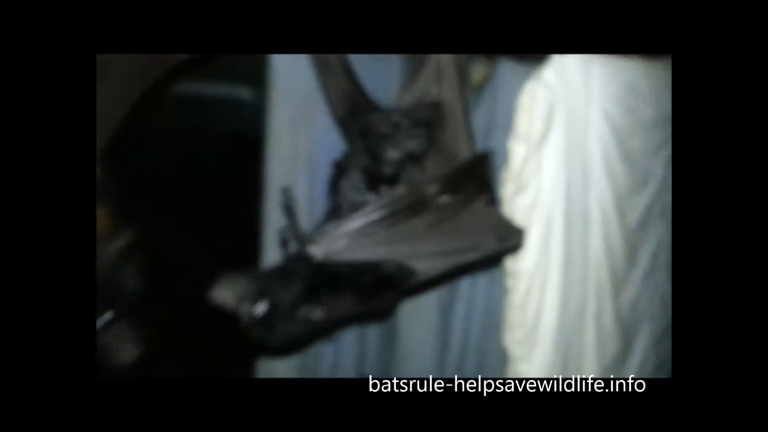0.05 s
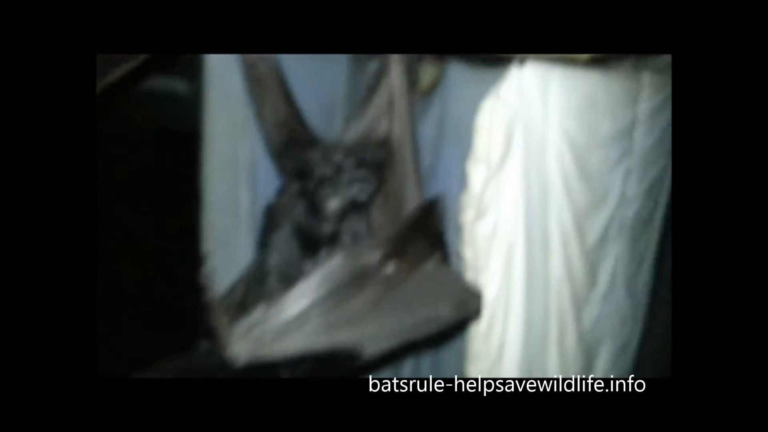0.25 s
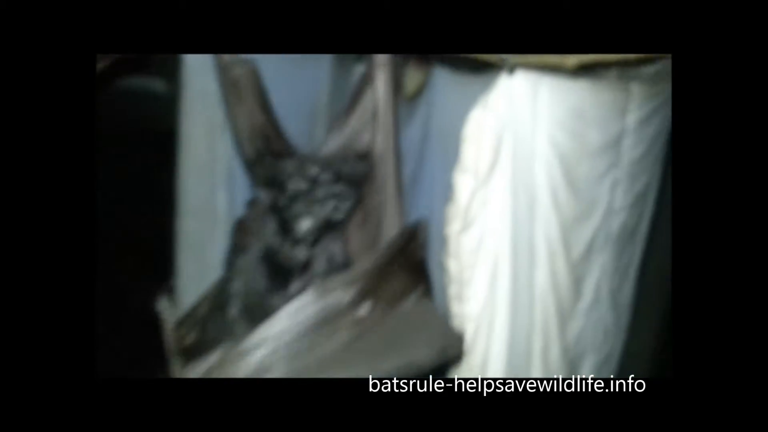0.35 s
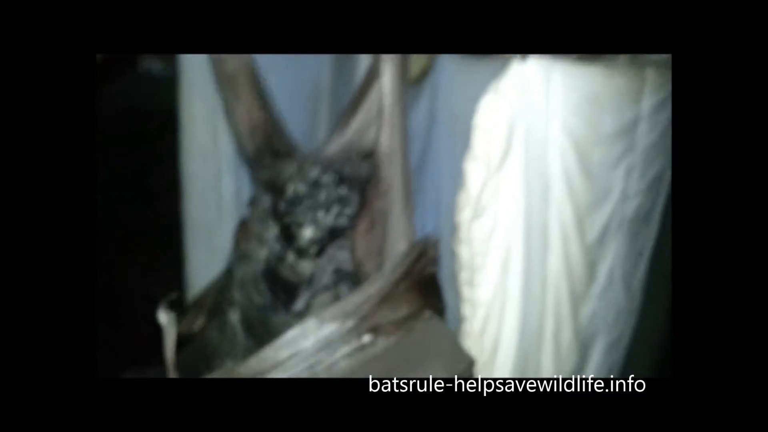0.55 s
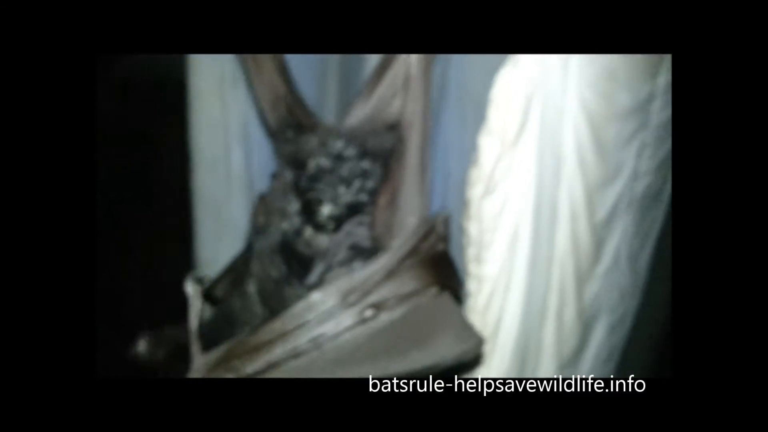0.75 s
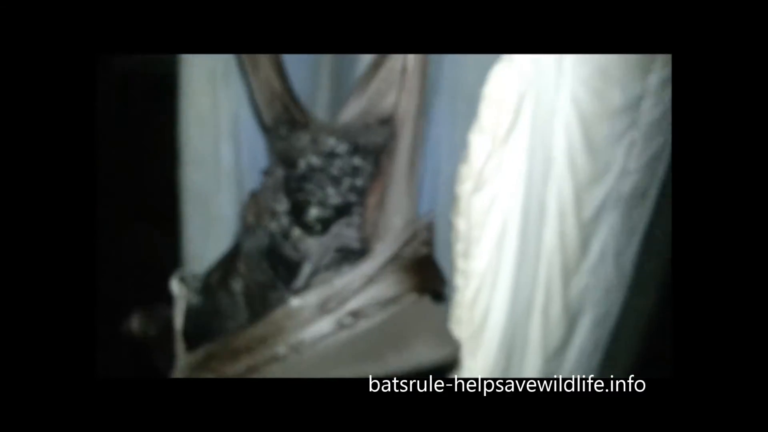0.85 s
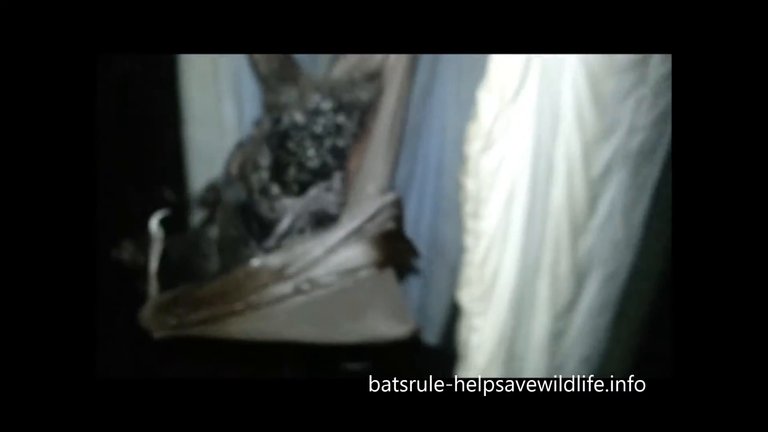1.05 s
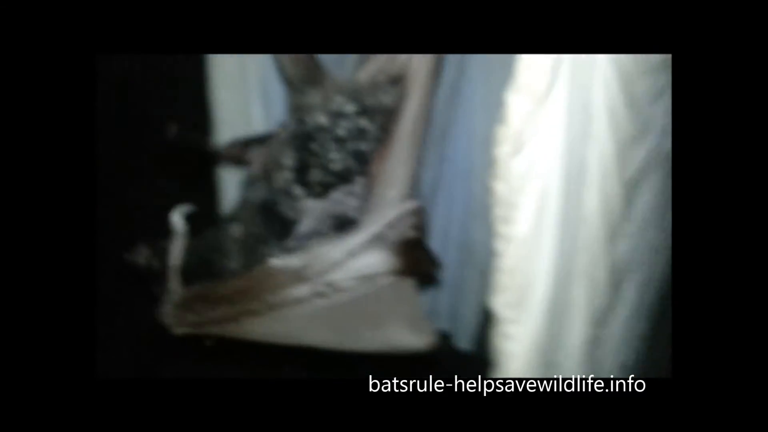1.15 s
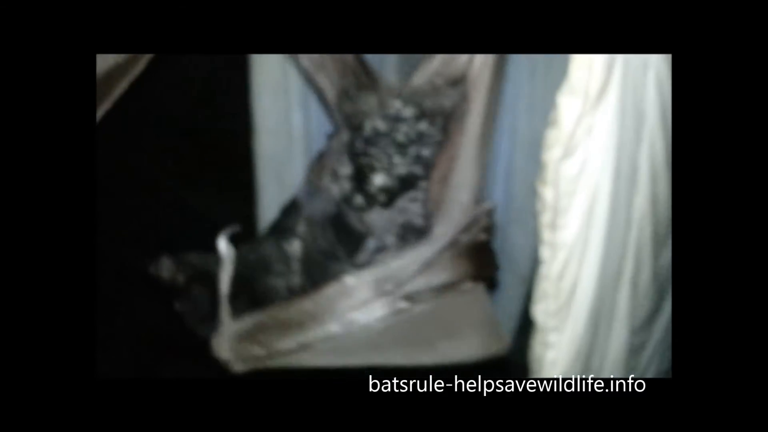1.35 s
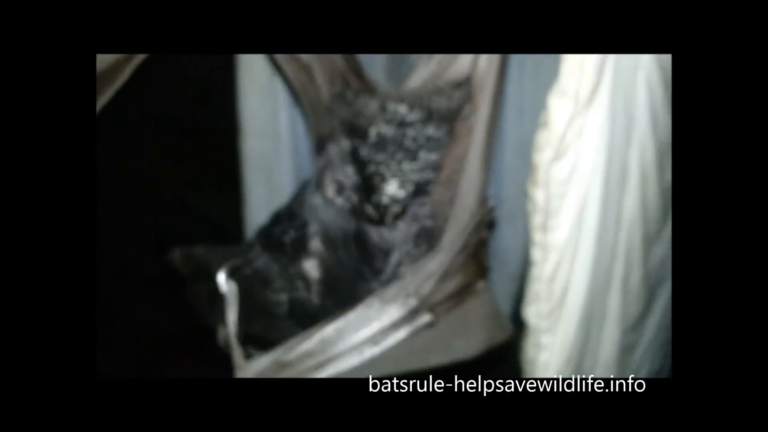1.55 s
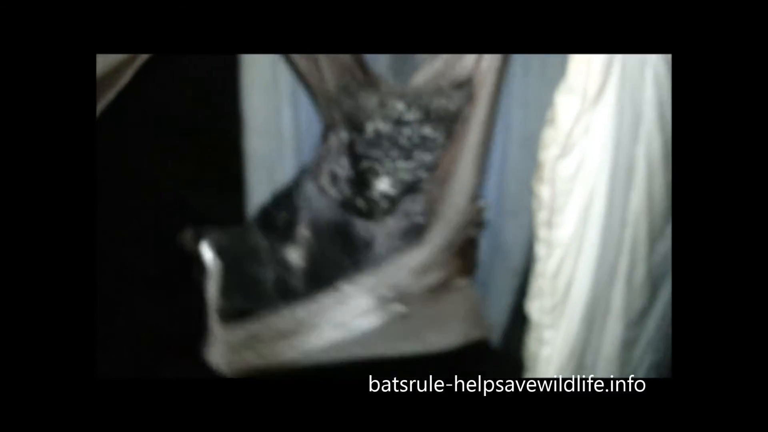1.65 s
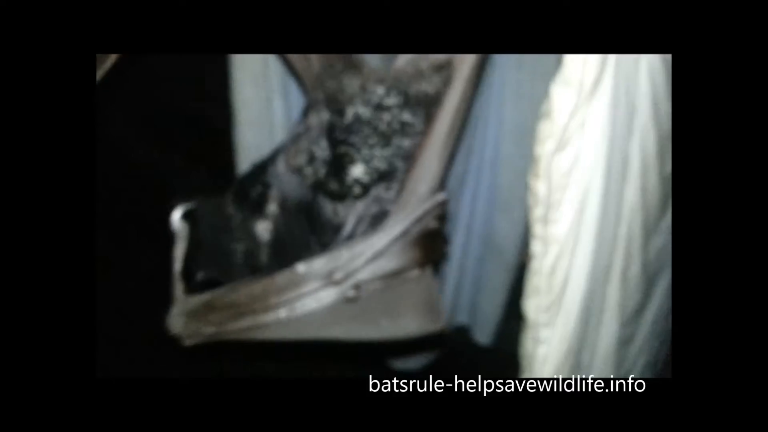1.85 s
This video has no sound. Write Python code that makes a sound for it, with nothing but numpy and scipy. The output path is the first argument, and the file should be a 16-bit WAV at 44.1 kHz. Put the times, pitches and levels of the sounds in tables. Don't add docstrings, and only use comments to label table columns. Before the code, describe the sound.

A large bat close to the microphone gives a brief rising whistle, a loud distorted squeal and a rough rasp with chirps and ticks, then a soft wing rustle and quiet hiss in a small enclosure.

```python
import sys
import numpy as np
from scipy import signal
from scipy.io import wavfile

SR = 44100
rng = np.random.default_rng(int(sys.argv[2]) if len(sys.argv) > 2 else 0)


def transcribe(signal):
    frames = np.atleast_2d(signal).T
    limited = np.clip(frames, -1, 1)
    pcm = np.round(limited * 32767).astype(np.int16)
    wavfile.write(sys.argv[1], SR, pcm)


def linear_from_db(decibels):
    return 10 ** (np.asarray(decibels, float) / 20)


N = 83790


def rms_one(x):
    return x / np.sqrt(np.mean(x ** 2) + 1e-20)


def in_time(rows):
    s, *columns = np.transpose(rows)
    t = np.arange(N) / SR
    gate = (t > s[0]) & (t < s[-1])
    return [np.interp(t, s, column) for column in columns] + [gate]


def drift(rate_hz):
    r = np.exp(-2 * np.pi * rate_hz / SR)
    wander = signal.lfilter([1], [1, -2 * r, r * r], rng.standard_normal(N + SR))
    return rms_one(wander[SR:])


def coloured(spectrum, patchy_db, channels=1):
    hz, db = np.transpose(spectrum)
    edges = 25 * 2 ** np.arange(0, 9.6, .5)
    white = rng.standard_normal((2, channels, N))
    out = 0
    for k, (low, high) in enumerate(zip(edges, edges[1:])):
        level_db = np.interp(np.log(low * high) / 2, np.log(hz), db)
        bandpass = signal.butter(2, [low, high], "band", fs=SR, output="sos")
        band = signal.sosfilt(bandpass, white[k % 2])
        out = out + band * linear_from_db(level_db + patchy_db * drift(10))
    return rms_one(out)


def resonance(x, hz, width_hz):
    r = np.exp(-np.pi * width_hz / SR)
    zeros = np.array([1, 0, -1]) * (1 - r * r) / 2
    poles = [1, -2 * r * np.cos(2 * np.pi * hz / SR), r * r]
    return signal.lfilter(zeros, poles, x + 1e-18)


def hump(hz, centre, width):
    return 1 / (1 + ((hz - centre) / width) ** 2 * 4)


def late(x, lag_s):
    return np.interp(np.arange(N) - lag_s * SR, np.arange(N), x)


def background():
    # freq_hz, level_db (per Hz)
    hum_colour = [(18, -52), (30, -28), (234, -2), (445, -2), (575, -6), (669, -9.5), (1270, -15),
                  (4300, -17), (5000, -16.5), (6500, -48), (11000, -120)]
    # freq_hz, level_db (per Hz)
    hiss_colour = [(18, -42.5), (30, -22), (406, -2), (450, -3.5), (1140, -8), (1300, -9.5), (3930, -15),
                   (6100, -22.5), (14300, -20)]
    hum_db, swell_db_per_s, hiss_db = -57, 4, -53.5
    hum = coloured(hum_colour, patchy_db=2.5)[0]
    both_sides = np.array([hum, late(hum, .00026)])
    swell = linear_from_db(swell_db_per_s * (np.arange(N) / SR - 2))
    hiss = linear_from_db(hiss_db) * coloured(hiss_colour, patchy_db=0.9, channels=2)
    return swell * linear_from_db(hum_db) * both_sides + hiss


def whistle():
    # time_s, pitch_hz, level_db
    glide = [
        (.166, 660, -50),
        (.171, 680, -38),
        (.185, 780, -34),
        (.195, 915, -22),
        (.200, 955, -20),
        (.206, 950, -19),
        (.2085, 930, -30),
    ]
    overtones_db = [2, -7, -20.5, -33.5, -41.5]
    hz, db, gate = in_time(glide)
    phase = 2 * np.pi * np.cumsum(hz) / SR
    tone = 0
    for k, overtone_db in enumerate(overtones_db):
        level = linear_from_db(overtone_db + 1.7 * k * drift(100))
        tone = tone + level * np.sin((k + 1) * phase)
    return gate * linear_from_db(db) * np.sqrt(2) * tone


def puffs():
    # start_s, level_db, t60_s
    bursts = [
        (.175, -47.5, 0.66),
        (.2075, -19.5, 0.084),
        (.248, -14, 0.078),
        (.259, -24.5, 0.03),
        (.3205, -29.5, .04),
    ]
    # freq_hz, level_db (per Hz)
    air_colour = [(100, -47), (250, -16), (450, -13), (1500, 3.5), (2800, -1.5), (4000, -8.5), (9000, -13),
                  (15000, -27)]
    t = np.arange(N) / SR
    shape = 0
    for start_s, db, t60_s in bursts:
        shape = shape + (t > start_s) * linear_from_db(db - 60 * np.clip(t - start_s, 0, 1) / t60_s)
    return shape * coloured(air_colour, patchy_db=-2.0)[0]


def squeal():
    # time_s, pitch_hz, level_db, mouth_hz, throat_boost_db
    path = [
        (.2065, 860, -46.5, 4720, -4.5),
        (.2085, 863.7, -15.5, 4350, 17),
        (.214, 863, -16.5, 4406, 10),
        (.223, 882.2, -11, 4600, 3),
        (.228, 975, -13, 3950, 9),
        (.2325, 1003, -14, 3900, 19),
        (.242, 1020, -17, 3100, 24),
        (.247, 960, -18, 2850, 19),
        (.254, 820, -21, 2588, 4.5),
    ]
    mouth_boost_db, mouth_width_hz = 19, 520
    throat_hz, throat_width_hz = 2050, 350
    tilt_db_per_oct, breath_db, waver_db = -7, -10.5, 2
    hz, db, mouth_hz, throat_db, gate = in_time(path)
    phase = 2 * np.pi * np.cumsum(hz * (1 + 0.011 * drift(150))) / SR
    breath = linear_from_db(breath_db) * rng.standard_normal(N) * (1 + np.cos(phase))
    voice = resonance(resonance(breath, 4500, 5000), 4500, 5400) * 2
    for k in range(1, 15):
        mouth_lift_db = mouth_boost_db * hump(k * hz, mouth_hz, mouth_width_hz * 2)
        throat_lift_db = throat_db * hump(k * hz, throat_hz, throat_width_hz * 2)
        tilt_db = tilt_db_per_oct * np.log2(k)
        level = linear_from_db(tilt_db + mouth_lift_db + throat_lift_db + waver_db * drift(80))
        voice = voice + level * np.sin(k * phase + k * k)
    return gate * linear_from_db(db) * voice


def chirps():
    # start_s, length_s, start_hz, end_hz, peak_db
    squeaks = [(.2075, .005, 4900, 4700, -7), (.292, .013, 1330, 1550, -25), (.518, .006, 1250, 1100, -26),
               (.2515, .0075, 2150, 2050, -2), (.258, .008, 2100, 1950, -12), (.267, .009, 2050, 2000, -16),
               (.3205, .010, 2200, 2150, -6.5), (.3205, .007, 4900, 4600, -21),
               (.498, .011, 5700, 5100, -18), (.499, .012, 2750, 2450, -9.5),
               (.509, .0075, 2350, 2050, -3.5), (.517, .007, 2400, 2200, -15),
               (.526, .007, 2200, 2000, -20)]
    rise_share, octave_db, wobble_share, shimmer_db = .55, -30, .025, 1.5
    t = np.arange(N) / SR
    wobble = 1 + wobble_share * drift(267)
    out = np.zeros(N)
    for start_s, length_s, start_hz, end_hz, db in squeaks:
        progress = np.clip((t - start_s) / length_s, 0, 1)
        shape = np.sin(np.interp(progress, [0, rise_share, 1], [0, np.pi / 2, np.pi]))
        hz = (start_hz + (end_hz - start_hz) * progress) * wobble
        phase = 2 * np.pi * np.cumsum(hz) / SR
        out += linear_from_db(db) * shape * (np.sin(phase) + linear_from_db(octave_db) * np.sin(2 * phase))
    return out * linear_from_db(shimmer_db * drift(300))


def rasp():
    # time_s, level_db, pulse_rate_hz, brightness_db
    path = [(.318, -55.5, 473.8, -6), (.323, -30, 471.6, 4.5), (.357, -25.5, 486.8, 0.5),
            (.372, -28, 475.4, -4.5), (.385, -28.5, 476.4, 7.5), (.428, -25, 480.8, 1.5),
            (.438, -29, 505.6, 1.5), (.456, -38, 549.6, 4), (.467, -21, 529.9, 4.5),
            (.485, -24, 497.3, 2.5), (.495, -30, 472, -1.5), (.505, -17, 441.9, -4.5),
            (.525, -32.5, 441, -6), (.58, -50.5, 433, -9.5)]
    # freq_hz, width_hz, level_db
    throat = [(900, 900, -22), (2160, 160, 0), (2600, 350, -6), (3500, 700, -10), (5700, 800, -8),
              (7200, 1200, -13), (11500, 3000, -20)]
    jitter_share, shimmer_db, breath_db = .09, 4, 3
    bright_from_hz, top_hz, waver_db, hum_db = 3000, 12800, 2.2, -21.5
    db, rate_hz, bright_db, gate = in_time(path)
    cycles = np.cumsum(rate_hz * (1 + jitter_share * drift(200))) / SR
    pulses = np.diff(np.floor(cycles), prepend=0) * linear_from_db(shimmer_db * rng.standard_normal(N))
    breath = rng.standard_normal(N) * np.exp(-2.0 * (cycles % 1))
    source = rms_one(pulses) + linear_from_db(breath_db) * rms_one(breath)
    source = signal.sosfilt(signal.butter(8, top_hz, fs=SR, output="sos"), source)
    voice = 0
    for k, (hz, width_hz, level_db) in enumerate(throat):
        gain = linear_from_db(level_db + waver_db * drift(40) + bright_db * (hz > bright_from_hz))
        ring = resonance(resonance(source, hz, width_hz * 1.9), hz, width_hz * 1.9)
        voice = voice + (-1) ** k * gain * rms_one(ring)
    hum = linear_from_db(hum_db + 8.1 * drift(53)) * np.sin(2 * np.pi * cycles + 0.91 * drift(49.76))
    return gate * linear_from_db(db) * (voice + hum)


def ticks():
    # time_s, peak_db, ring_hz
    clicks = [
        (.426, -26.5, 7600),
        (.547, -29.5, 5992),
        (.5605, -31, 6540),
        (.655, -54.5, 6900),
    ]
    out = np.zeros(N)
    for time_s, db, ring_hz in clicks:
        click = np.zeros(N)
        click[int(time_s * SR)] = linear_from_db(db + 14.5)
        out += resonance(click, ring_hz, 2500)
    return out


def rustle():
    # start_s, length_s, level_db
    strokes = [
        (0.501, 0.12, -43),
        (0.594, 0.079, -41.5),
        (0.615, 0.14, -52.5),
        (1.644, 0.045, -56),
        (1.751, 0.032, -51),
    ]
    # freq_hz, level_db (per Hz)
    cloth_colour = [(180, -58), (300, -22.5), (553, 4), (860, -11.5), (1110, 8.5), (1360, -2),
                    (9000, -24.5), (11700, -64), (19800, -120)]
    t = np.arange(N) / SR
    shape = 0
    for start_s, length_s, db in strokes:
        shape = shape + linear_from_db(db) * np.sin(np.pi * np.clip((t - start_s) / length_s, 0, 1))
    grain = linear_from_db(2.2 * drift(120))
    return shape * grain * coloured(cloth_colour, patchy_db=-1.5, channels=2)


def ports(bat):
    # freq_hz, width_hz, left_gain, right_gain (added)
    lifts = [(2078, 400, 1, 0.017), (2800, 600, -1.1, 0.13), (5930, 1500, -0.41, 0.77)]
    # left_delay_s, right_delay_s, level_db
    echoes = [(.0011, .0017, -5), (.0029, .0023, -15.5), (.0043, .0052, -9)]
    lag_s, pan_db = .00024, 1
    direct = [late(bat, lag_s) * linear_from_db(pan_db / 2), bat * linear_from_db(-pan_db / 2)]
    bright = resonance(resonance(bat, 9000, 9000), 9000, 9000)
    sides = []
    for side, x in enumerate(direct):
        colour = sum(row[2 + side] * resonance(x, row[0], row[1]) for row in lifts)
        reflections = sum(linear_from_db(row[2]) * late(bright, row[side]) for row in echoes)
        sides.append(x + colour + reflections)
    return np.array(sides)


def enclosure(bat):
    ring_hz, ring_width_hz, t60_s = 2150, 1100, .17
    room_db, broad_share = -19, .35
    t = np.arange(SR // 2) / SR
    sides = []
    for _ in range(2):
        tail = rng.standard_normal(len(t)) * linear_from_db(-60 * t / t60_s) * np.clip(t / .004, 0, 1)
        tail = resonance(tail, ring_hz, ring_width_hz) + broad_share * tail
        tail = tail / np.sqrt(np.sum(tail ** 2))
        sides.append(signal.fftconvolve(bat, tail)[:N])
    return linear_from_db(room_db) * np.array(sides)


def scene():
    bat = whistle() + puffs() + squeal() + chirps() + rasp() + ticks()
    return ports(bat) + enclosure(bat) + rustle() + background()


def low_pass(x):
    return signal.sosfilt(signal.butter(12, 14430, fs=SR, output="sos"), x)


def record(dry):
    ceiling, knee, uneven_share = 1.0, 12, .008
    top = ceiling * (1 - uneven_share * (dry < 0))
    mix = dry / (1 + np.abs(dry / top) ** (2 * knee)) ** (.5 / knee)
    return low_pass(mix)


dry = scene()
out = record(dry)
transcribe(out)
```